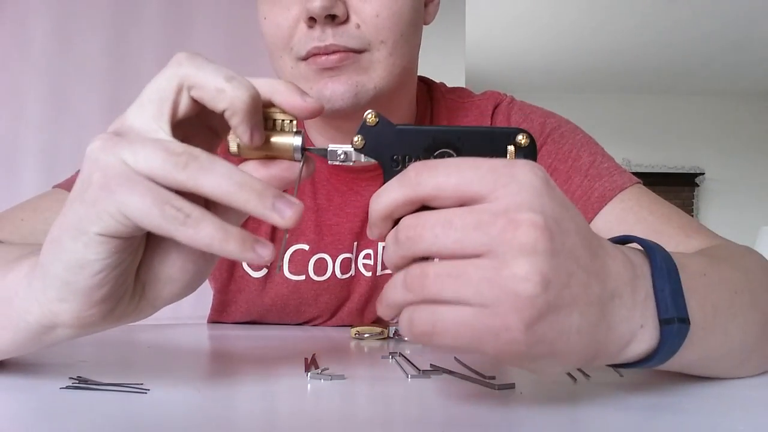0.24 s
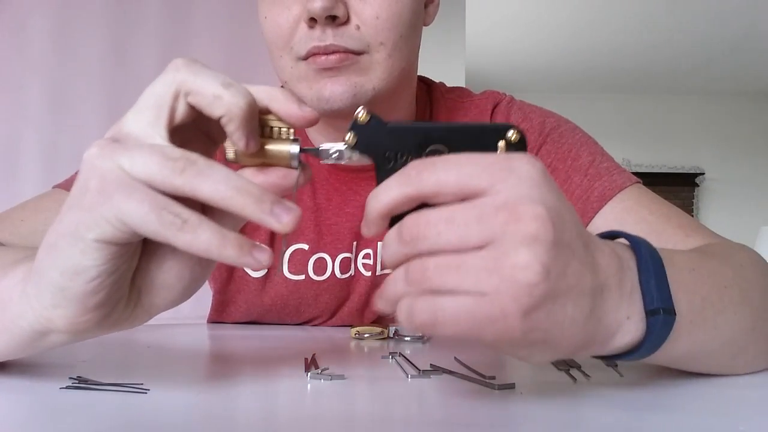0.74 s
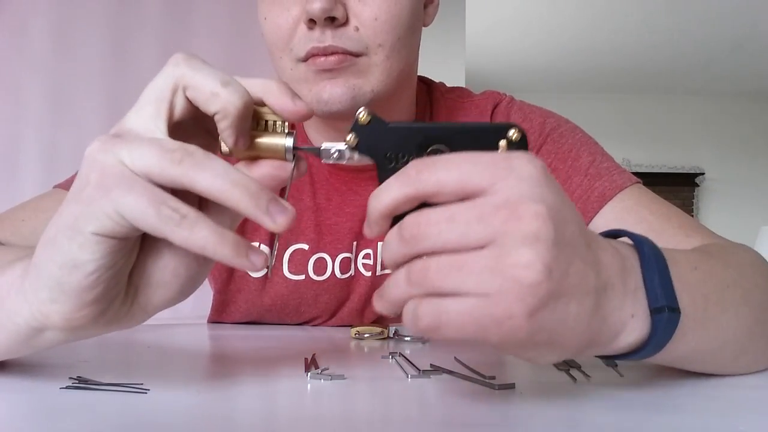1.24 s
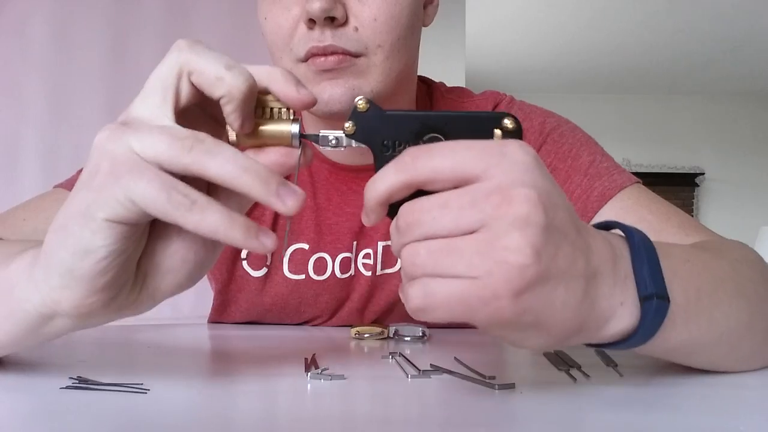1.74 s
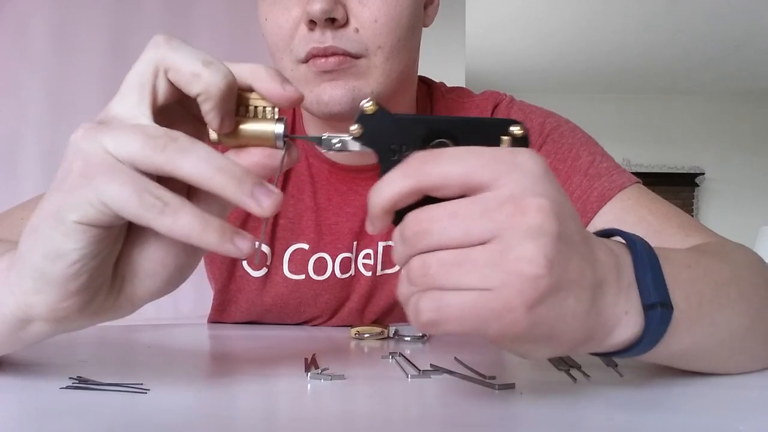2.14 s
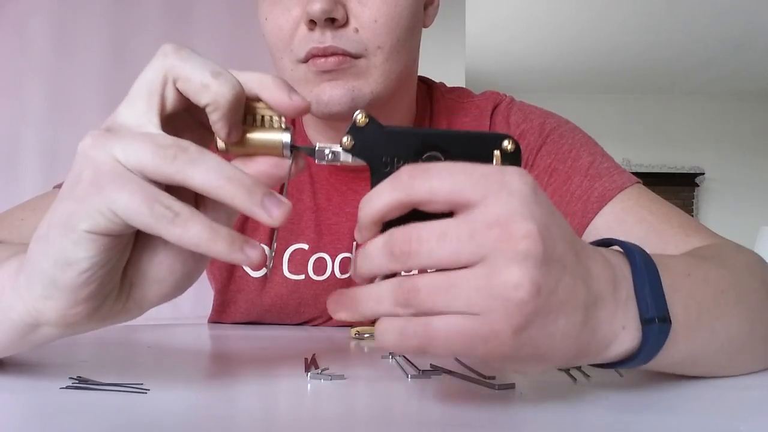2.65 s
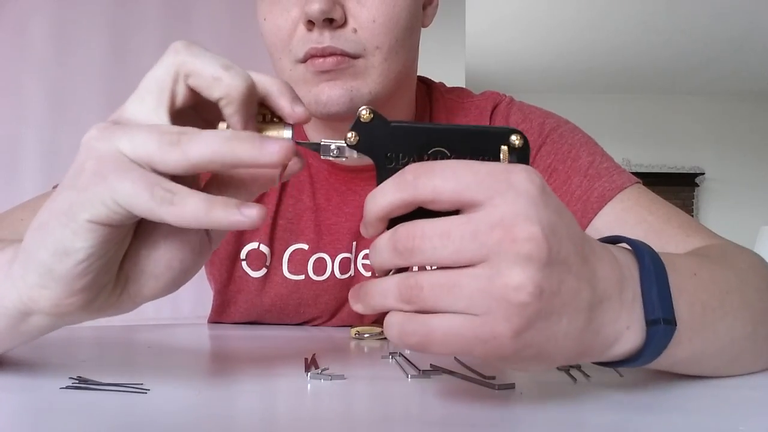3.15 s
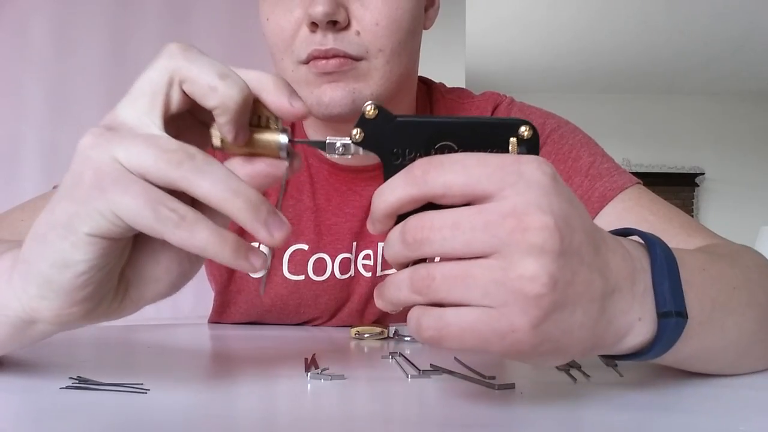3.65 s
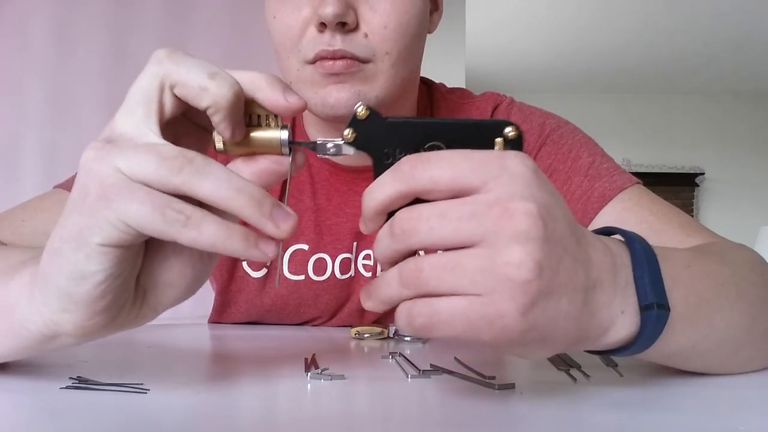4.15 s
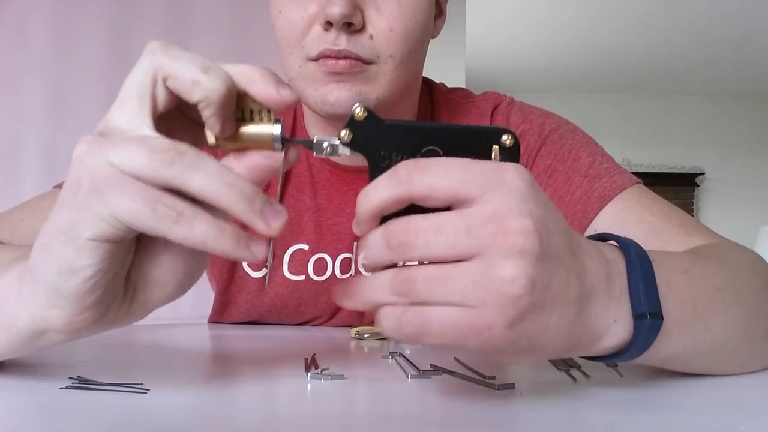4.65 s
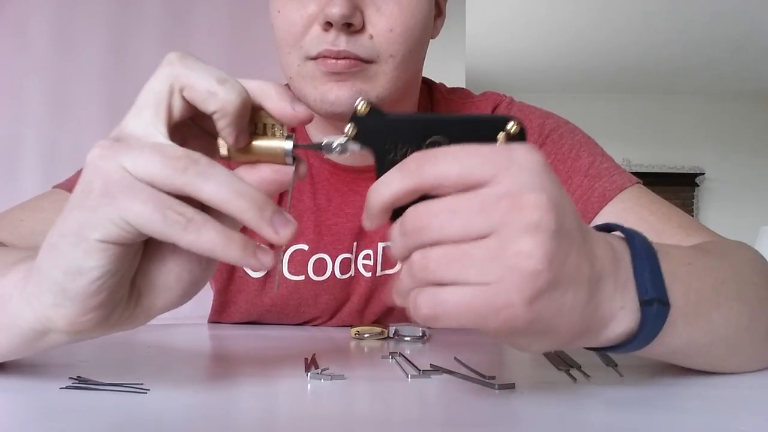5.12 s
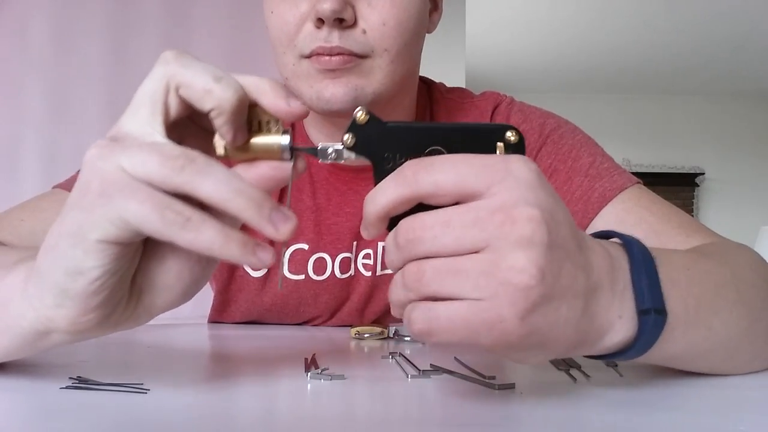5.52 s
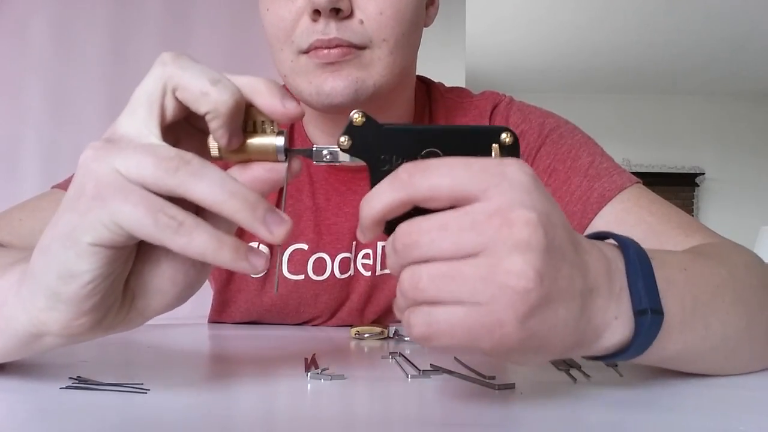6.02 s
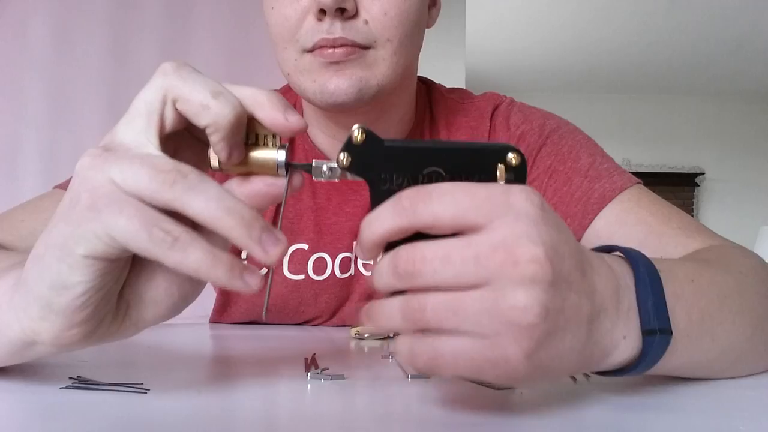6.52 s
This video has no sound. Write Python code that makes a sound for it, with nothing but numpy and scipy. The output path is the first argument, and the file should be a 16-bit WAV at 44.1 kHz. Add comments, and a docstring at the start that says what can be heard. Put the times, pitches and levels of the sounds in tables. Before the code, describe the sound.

Close to a stereo microphone in a small bare room, a spring tool fires against a brass lock. Each squeeze gives a loud, sharp snap with a slight thump, followed by a bright clack as the trigger returns. Seven such pairs, a short lull with faint ticks, then another run of pairs. Small loose parts tick between blows; low hum and hiss stay faint beneath.

```python
"""Spring-driven pick gun in a brass lock

A pick gun snaps against a brass lock, close to two microphones in a small bare room. Each squeeze fires
the needle, each release clacks the trigger back; loose parts tick between. Noise rattles excite damped
modes and a decaying room; one low gliding sine is a knock through the table. Sine hum and filtered hiss
lie beneath, louder at the start and again around the beginning of the second run."""
import sys
import numpy as np
from scipy import signal
from scipy.fft import rfft, irfft
from scipy.io import wavfile
from scipy.ndimage import uniform_filter1d

SR = 44100
rng = np.random.default_rng(int(sys.argv[2]) if len(sys.argv) > 2 else 0)


def persist_wave(psi):
    """Save psi, clipped to +-1, as 16-bit WAV."""
    counts = np.round(np.clip(psi, -1, 1) * 32767).astype(np.int16)
    wavfile.write(sys.argv[1], SR, np.atleast_2d(counts).T)


N = 298998  # samples in the scene

# Ticks of trigger, spring and needle: t/s, peak level/dB, treble level/dB
TICK_EVENTS = [(-0.02, -17, -9), (0.0942, -46, -15), (0.2425, -16.5, -31), (0.388, -23.5, -26),
               (0.3912, -30, -3), (0.433, -16.5, -1), (0.4396, -18, -2), (0.4458, -24, -4),
               (0.46, -33, -14), (0.4846, -18, -4), (0.6393, -20.5, -1.5), (0.682, -10.5, 7),
               (0.788, -32, 8), (0.796, -22, 0.5), (0.817, -38, -15), (0.9417, -35, -1), (0.9508, -32, -12),
               (1.1298, -26, 1.5), (1.2699, -24, 2.5), (1.407, -33, -2), (1.5769, -25, -4),
               (1.9429, -24, 3.5), (2.056, -24, -2), (2.1433, -24.5, 1.5), (2.156, -34.5, 1),
               (2.3267, -24, 4.5), (2.4475, -23.5, -1.5), (2.6936, -25, 2.5), (2.771, -32, -8),
               (2.7914, -26, -3), (3.056, -24, 2), (3.1373, -28, -1), (3.2249, -28, 9), (3.466, -46, -11),
               (3.481, -47.5, -11.5), (3.5486, -54, -5), (3.5835, -50, -4), (3.5998, -53.5, -10.5),
               (3.664, -47.5, -7), (3.678, -46.5, -6.5), (3.734, -47.5, -6.5), (3.8435, -39.5, -1),
               (3.866, -45, -5), (3.901, -35, 2), (3.928, -34.5, 2), (3.948, -34.5, 0), (4.0053, -27.5, 0),
               (4.046, -19.5, -2.5), (4.1826, -15.5, -11), (4.2381, -7.5, -1), (4.356, -15, -13),
               (4.398, -29, -18), (4.6712, -23, 0), (4.78, -21, -7), (4.8686, -24.5, -2), (5.0432, -28, 3),
               (5.1206, -26, -5), (5.2102, -32.5, -7), (5.412, -35, -8), (5.4223, -24.5, -5),
               (5.5104, -25.5, -3), (5.823, -25.5, -1), (5.903, -22.5, -10), (6.1785, -26, -3),
               (6.251, -25, -15), (6.2677, -23, 0), (6.547, -25.5, -4), (6.6368, -21.5, -5),
               (6.723, -37.5, 1)]
# Level shared by hum and hiss: t/s, level/dB
BACKGROUND_LEVEL = [(0, -44), (.2, -45), (.48, -43), (.53, -85), (.68, -53.5), (1, -62), (2, -58.5),
                    (3.2, -62.5), (3.75, -61), (3.95, -56.5), (4.1, -47), (4.25, -47), (4.45, -47.5),
                    (4.52, -54.5), (4.9, -60), (5.3, -59.5), (6.78, -59.5)]
# Hum tones before the shared level: f/Hz, relative level/dB
HUM_TONES = [(120, -1), (240, -26), (360, -29.5)]
# Shape of the hiss spectrum: f/Hz, relative level per Hz/dB
HISS_SPECTRUM = [(25, -12), (50, -20), (90, -6), (180, -2), (300, -9), (900, -27), (1500, -19.5),
                 (2100, -20), (2800, -28.5), (8000, -28.5), (15000, -29.5)]
# Needle fires: t/s, peak level/dB, housing f/Hz, steel f/Hz, treble level/dB, brass level/dB
SNAP_EVENTS = [(0.5166, 1.5, 1924, 7460, 1, 2), (0.996, -6.5, 2010, 7560, 1.5, 1.5),
               (1.4402, -5, 1800, 7470, 3, 9.5), (1.7665, -7.5, 1970, 7400, 2.5, 5.5),
               (2.1694, -3.5, 1740, 7570, 3.5, 10.5), (2.5348, -1.5, 2020, 7850, 7, 5),
               (2.8781, -6, 1970, 7270, 4.5, 5), (4.4957, -1, 1865, 7800, 5, 7.5),
               (4.8888, -4, 1960, 7200, 5, 6), (5.256, -4.5, 1940, 7060, 2.5, 6),
               (5.6605, -2, 1750, 7800, 4.5, 8.5), (6.0059, -4, 2010, 7750, 5, 6),
               (6.3673, -6, 2070, 7530, 3.5, 12)]
# Trigger clacks back: t/s, peak level/dB, housing f/Hz, steel f/Hz, treble level/dB, brass level/dB
RETURN_EVENTS = [(0.6717, -4, 1980, 8230, 4.5, 6), (1.1712, -7, 2000, 8500, 8, 3),
                 (1.6041, -4.5, 1920, 8400, 4.5, 2.5), (1.9712, -6, 1890, 7950, 4, 3),
                 (2.358, -3.5, 2010, 7550, 2.5, 2.5), (2.722, -5.5, 1930, 7900, 3, -1.5),
                 (3.0816, -6, 2040, 7840, 3, 0), (4.2656, 1, 2100, 6580, 0, 2.5),
                 (4.7055, -3.5, 2070, 7600, 0, -7.5), (5.0778, -6, 1900, 7240, 4, 5),
                 (5.4568, -3, 2030, 8550, 3.5, 2), (5.857, -3, 2010, 7970, 2.5, 2),
                 (6.2082, -4.5, 1840, 6750, 4, 6), (6.5803, -5.5, 1980, 8360, 1.5, 0.5)]
# Faint short ticks just before some snaps: t/s, peak level/dB
FAINT_TICK_EVENTS = [(0.979, -55), (1.43, -41), (2.871, -25), (6.348, -33), (6.358, -57)]
# Knock through the table: t/s, level/dB, end f/Hz, extra f at onset/Hz, glide time/s, decay time T60/s
TABLE_KNOCKS = [(5.663, -12.5, 64.4, 343, 0.0018, 0.068)]
# Other resonances of gun and lock: f/Hz, bandwidth/Hz, level/dB before scatter and treble
GUN_MODES = [(3994, 250, -7), (4845, 420, -10.5), (6180, 330, -9.5), (8650, 137, -5), (13940, 6800, -12.5),
             (15800, 660, -13)]
# Reverberation of the room: f/Hz, T60/s
ROOM_DECAY = [(200, 0.35), (1000, 0.46), (2000, 0.46), (4000, 0.43), (8000, 0.36), (14000, 0.33)]
# Colour of the reflections: f/Hz, left level/dB, right level/dB
REFLECTION_COLOUR = [(304, 6.5, 5), (1000, -5.5, -5), (2120, -5.5, -6), (3640, -1.5, -1.5), (5600, 4, -0.5),
                     (7200, -1.5, 4), (11000, -3, 0.5), (15000, -10.5, -1.5)]

# What all blows of a kind share: levels in dB, brass pitch in Hz, rise and fall in s, bounces as a share;
# pan_db is left over right, before the treble tilt.
TICK = dict(thump_db=-28.5, pan_db=2.5, room_db=-11.5, brass_hz=1150, bounce=0.08, brass_db=3.5,
            trigger_db=-5, spring_db=-5.5, rise_s=0.00067, fall_s=0.0047)
SNAP = dict(thump_db=-15, pan_db=1, room_db=-9.5, brass_hz=1098, bounce=0.14,
            trigger_db=-3.5, spring_db=-6.5, rise_s=0.0021, fall_s=0.0052)
RETURN = dict(thump_db=-35.5, pan_db=1, room_db=-10, brass_hz=1217, bounce=0.15,
              trigger_db=-3, spring_db=-3.4, rise_s=0.0024, fall_s=0.0043)
FAINT_TICK = dict(thump_db=-29.5, pan_db=-0.5, room_db=-15.5, brass_hz=1127, bounce=0.096, brass_db=-1.5,
                  trigger_db=-17, spring_db=-3.5, rise_s=0.0012, fall_s=0.0024)
TICK_HOUSING_HZ, TICK_STEEL_HZ, FAINT_TICK_HOUSING_HZ = 1917, 7530, 1800
# Ticks come from many spots: spread of housing pitch (share) and of left-right balance (dB).
TICK_DETUNE, TICK_SCATTER_DB = 0.04, 3
# Hands shade the weaker loose ticks, so the room carries more of them: dB of room per dB below SHADED_DB.
SHADED_DB, SHADED_WET = -32, 0.4
LAG_S = 6 / SR  # the right microphone is farther from the gun
LENGTH, HOP = 2 ** 14, 64  # samples: a blow with its tail, and one frame of the room
TICK_FRAMES = 129  # all ticks are followed half as long
EDGE_HZ = 14750  # upper band limit


def amp(db):
    """Level and amplitude: 20 dB is a factor of ten."""
    return 10 ** (np.asarray(db) / 20)


def read(hz, at_hz, values):
    """Logarithmic pitch scale: values are interpolated along log frequency."""
    return np.interp(np.log(hz + 1), np.log(np.asarray(at_hz) + 1), values)


def add(mix, s, sound):
    """Superposition: a sound is summed in from time s, cut at the ends of the scene."""
    start = round(s * SR)
    part = mix[:, max(start, 0):][:, :sound.shape[1] + min(start, 0)]
    part += sound[:, max(-start, 0):][:, :part.shape[1]]


def ring(hz, mode_hz, width_hz):
    """Damped resonance: the response of one mode, with gain 1 at its centre."""
    return 1j * hz * width_hz / (mode_hz ** 2 - hz ** 2 + 1j * hz * width_hz)


def causal(gain):
    """Minimum phase: a gain over pitch is given the phase with which it rings only after its blow."""
    half = len(gain) - 1
    folded = irfft(np.log(gain + 1e-5))
    one_sided = np.concatenate([folded[:1], 2 * folded[1:half], np.zeros(half)])
    return np.exp(rfft(one_sided))


def blend(shared, own, same):
    """Partial coherence: shared and separate noise spectra mix at constant power."""
    return same * shared + np.sqrt(1 - same ** 2) * np.array(own)


def pair(same, size):
    """Coherence at two microphones: noise alike in the bass, falling to the share same in the treble."""
    shared, *own = rfft(rng.standard_normal((3, size)))
    hz = np.fft.rfftfreq(size, 1 / SR)
    alike = np.clip(same + (1 - same) / (1 + hz / 300), 0, 1)
    return irfft(blend(shared, own, alike))


def reflections():
    """Reverberation: level over pitch and time at each microphone, each band dying at its own speed."""
    hz = np.fft.rfftfreq(2 * HOP, 1 / SR)
    t = np.arange(LENGTH // HOP + 1) * HOP / SR
    at_hz, left_db, right_db = np.transpose(REFLECTION_COLOUR)
    colour_db = np.array([read(hz, at_hz, left_db), read(hz, at_hz, right_db)])[:, :, None]
    # a far-wall cluster near 47 ms, stronger on the right
    wall_db = np.array([3., 5.])[:, None, None] * np.exp(-((t - 0.047) / 0.011) ** 2)
    decay_db = -60 * t / read(hz, *np.transpose(ROOM_DECAY))[:, None]
    density = np.clip(t / 0.0043 - 0.3, 0, 1)  # full from about 5.6 ms
    level = amp(colour_db + wall_db + decay_db) * density
    return level / np.sqrt((level[0] ** 2).sum(1).mean())


def resonant_body(hz, housing_hz, steel_hz, treble_db, thump_db, brass_hz, brass_db, trigger_db, spring_db):
    """Modal superposition: ringing small parts, brass, and the low thump of the lock."""
    spread_db = 2.2 * rng.standard_normal(len(GUN_MODES))  # each blow lands differently
    modes = [(f, w, db + off_db + treble_db) for (f, w, db), off_db in zip(GUN_MODES, spread_db)]
    modes += [(housing_hz, 260, 6), (steel_hz, 800, treble_db - 3.5), (3250, 400, trigger_db)]
    modes += [(10700, 500, spring_db), (11550, 400, spring_db)]
    # these modes belong to separate parts, so their powers add
    power = sum(abs(amp(db) * ring(hz, f, w)) ** 2 for f, w, db in modes)
    metal = causal(np.sqrt(power)) + amp(brass_db) * ring(hz, brass_hz, 84)
    metal *= (1j * hz / (650 + 1j * hz)) ** 4  # small parts radiate little bass
    # a wide knock of the lock body, and a low jolt arriving 14 ms late through arms and table
    knock = ring(hz, 450, 960)
    jolt = amp(2.5) * ring(hz, 90, 53) * np.exp(-2j * np.pi * hz * 0.014)
    return metal + amp(thump_db) * (knock + jolt)


def blow(room, housing_hz, steel_hz, treble_db, pan_db, room_db, rise_s, fall_s, bounce, **parts):
    """Impact excitation: a short rattle of contacts and its reflections ring the modes; peak about 1."""
    size = (room.shape[2] - 1) * HOP
    t, hz = np.arange(size) / SR, np.fft.rfftfreq(size, 1 / SR)
    main_contact = np.exp(-np.maximum(t - rise_s, 0) / fall_s)
    bounces = bounce * np.exp(-t / 0.0062)
    swell = np.minimum(t / rise_s, 1) ** 2 * (main_contact + bounces)
    strength = np.linalg.norm(swell)
    body = resonant_body(hz, housing_hz, steel_hz, treble_db, **parts)
    body_gain = np.sqrt(np.mean(abs(body) ** 2))

    # the treble favours the right microphone
    left_db = pan_db - 1.8 * np.clip(np.log2((hz + 1) / 4000), 0, 1)
    right_delay = np.exp(-2j * np.pi * hz * LAG_S)
    ports = np.array([amp(left_db / 2), amp(-left_db / 2) * right_delay])
    rattle = rfft(swell * pair(0.55, size))
    direct = irfft(rattle * body * ports)
    direct *= strength * body_gain / np.sqrt((direct ** 2).sum(1).mean())

    # the gun shifts in the hand, so no two blows meet the walls alike
    frames = signal.stft(pair(0.18, size), nperseg=2 * HOP)[2]
    scattered = signal.istft(frames * room, nperseg=2 * HOP)[1]
    tail = rfft(scattered / np.sqrt(HOP)) * body * strength
    # the walls return part of the uneven fine spectrum of this rattle
    rattle_power = (abs(rattle) ** 2).mean(0)
    uneven = np.sqrt(uniform_filter1d(rattle_power, size=size // 400)) ** 0.6
    tail = irfft(tail * uneven / np.sqrt(np.mean(uneven ** 2)))
    return (direct + amp(room_db) * tail) / body_gain / 2


def loose_ticks(room):
    """Light impacts: trigger, spring and needle tick at scattered spots, the weaker ones with more room."""
    out = np.zeros((2, N))
    scatter = rng.standard_normal((len(TICK_EVENTS), 2))
    for (s, db, treble_db), (pitch, side) in zip(TICK_EVENTS, scatter):
        spot = dict(TICK)
        spot["pan_db"] += TICK_SCATTER_DB * side
        spot["spring_db"] += treble_db
        spot["room_db"] += SHADED_WET * max(SHADED_DB - db, 0)
        housing_hz = TICK_HOUSING_HZ * (1 + TICK_DETUNE * pitch)
        tick = blow(room[:, :, :TICK_FRAMES], housing_hz, TICK_STEEL_HZ, treble_db, **spot)
        add(out, s - 0.0008, amp(db) * tick)  # starts ahead of its listed peak
    return out


def background():
    """Harmonic tones and coloured noise: mains hum over hiss, shared in the bass, separate in the treble."""
    t, hz = np.arange(N) / SR, np.fft.rfftfreq(N, 1 / SR)
    hum = sum(amp(db) * np.sqrt(2) * np.sin(2 * np.pi * (f * t + rng.random())) for f, db in HUM_TONES)
    shared, *own = rfft(rng.standard_normal((3, N)))
    same = np.clip(1 / (1 + hz / 1500), 0, 1)
    hiss = irfft(blend(shared, own, same) * amp(read(hz, *np.transpose(HISS_SPECTRUM))), N)
    hiss *= amp(-9.5) / hiss.std()
    level = amp(np.interp(t, *np.transpose(BACKGROUND_LEVEL)))
    return (hum * amp([[-0.7], [0.7]]) + hiss) * level  # hum slightly stronger on the right


def full_blows(events, kind, room):
    """Repeated impact: blows of one kind, each with its own pitches and levels."""
    out = np.zeros((2, N))
    for s, db, housing_hz, steel_hz, treble_db, brass_db in events:
        sound = blow(room, housing_hz, steel_hz, treble_db, brass_db=brass_db, **kind)
        add(out, s - 0.0015, amp(db) * sound)  # starts ahead of its listed peak
    return out


def needle_snaps(room):
    """Impulsive excitation: the fired needle rings gun and lock with a marked thump."""
    return full_blows(SNAP_EVENTS, SNAP, room)


def trigger_returns(room):
    """Impulsive excitation: the returning trigger rings the same parts with little thump."""
    return full_blows(RETURN_EVENTS, RETURN, room)


def faint_ticks(room):
    """Brief excitation: faint short ticks ring the same modes just before some snaps."""
    out = np.zeros((2, N))
    for s, db in FAINT_TICK_EVENTS:
        tick = blow(room[:, :, :TICK_FRAMES], FAINT_TICK_HOUSING_HZ, TICK_STEEL_HZ, 0, **FAINT_TICK)
        add(out, s, amp(db) * tick)
    return out


def table_thud():
    """Damped oscillation: a low swing through the table whose pitch drops as it dies."""
    out, t = np.zeros((2, N)), np.arange(SR // 4) / SR
    for s, db, end_hz, extra_hz, glide_s, t60 in TABLE_KNOCKS:
        turns = end_hz * t + extra_hz * glide_s * (1 - np.exp(-t / glide_s))
        swing = amp(db - 60 * t / t60) * np.sin(2 * np.pi * turns)
        add(out, s, swing * amp([[-0.7], [0.7]]))
    return out


def scene():
    """Linear superposition: gun and lock in one room, table knock, hum and hiss."""
    room = reflections()
    gun = loose_ticks(room) + needle_snaps(room) + trigger_returns(room) + faint_ticks(room)
    return gun + background() + table_thud()


def record(dry):
    """Clipping and band limitation: a hard ceiling, then a linear-phase low-pass."""
    taps = signal.firwin(121, EDGE_HZ, window=("kaiser", 6), fs=SR)
    return signal.oaconvolve(np.clip(dry, -0.95, 0.95), taps[None], "same")


dry = scene()
out = record(dry)
persist_wave(out)
```